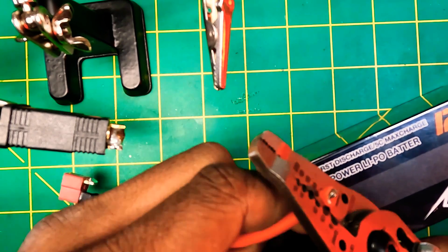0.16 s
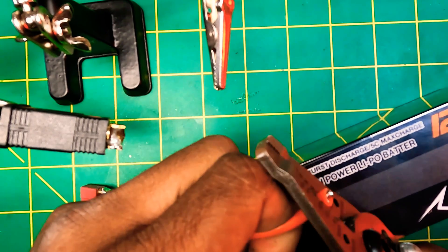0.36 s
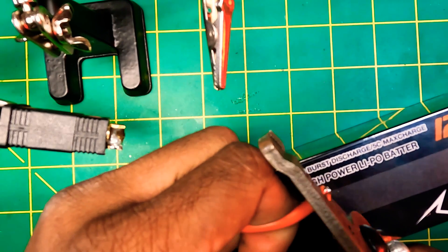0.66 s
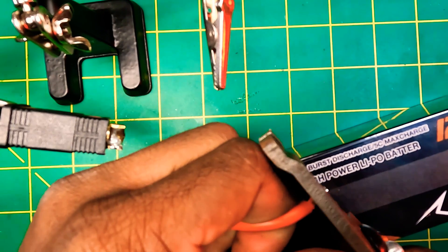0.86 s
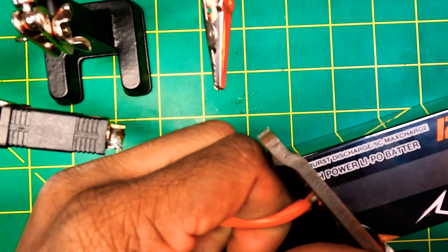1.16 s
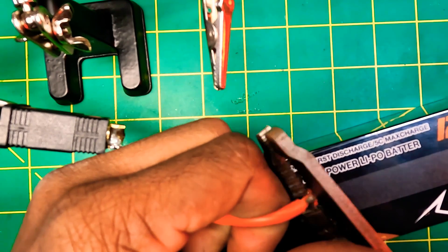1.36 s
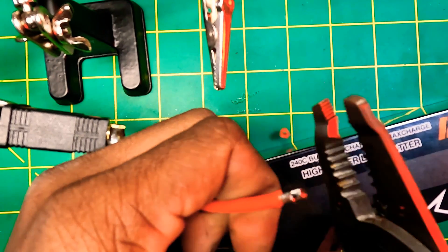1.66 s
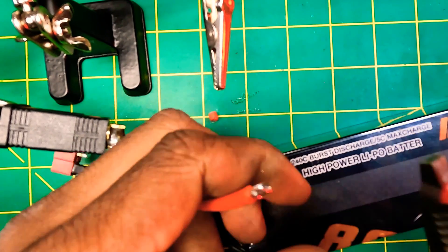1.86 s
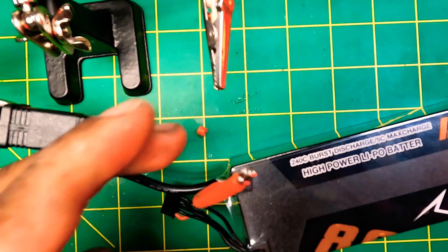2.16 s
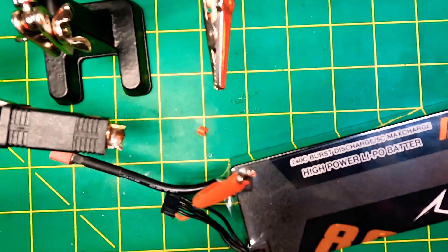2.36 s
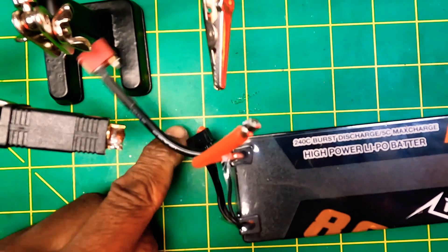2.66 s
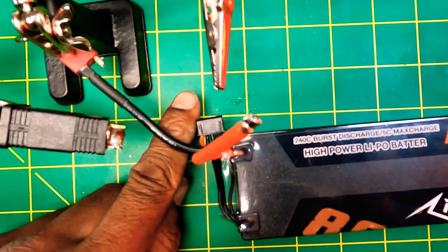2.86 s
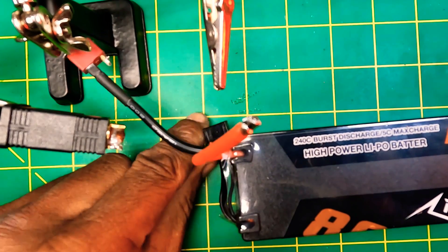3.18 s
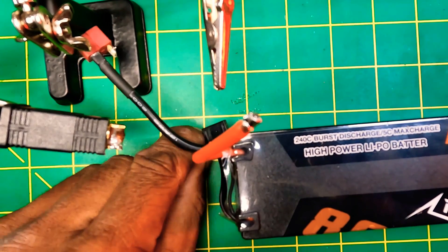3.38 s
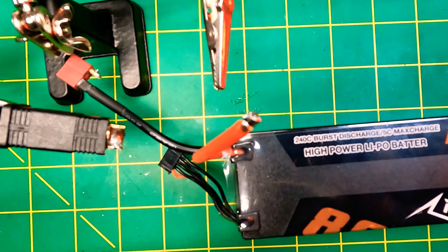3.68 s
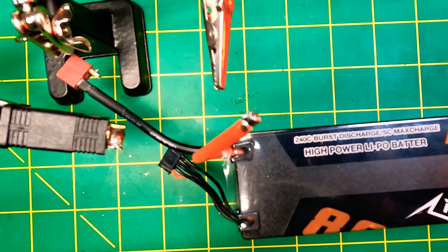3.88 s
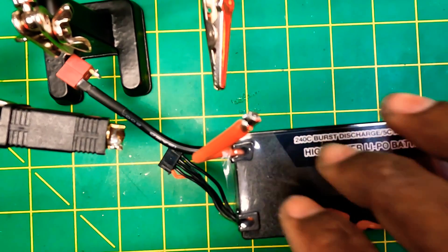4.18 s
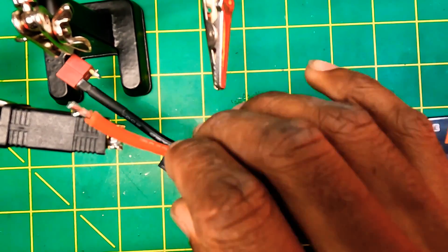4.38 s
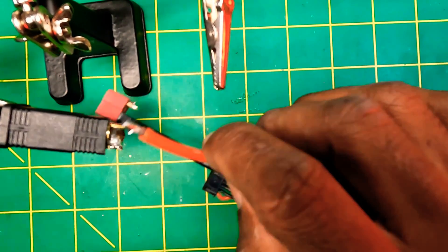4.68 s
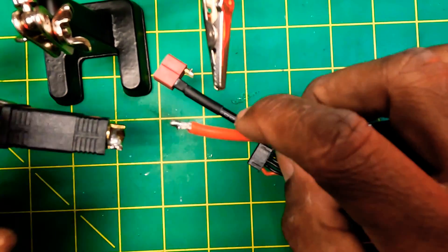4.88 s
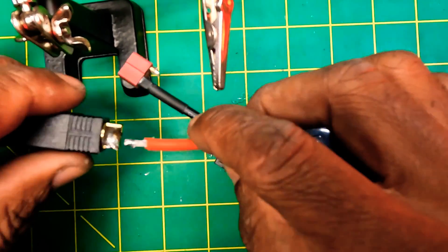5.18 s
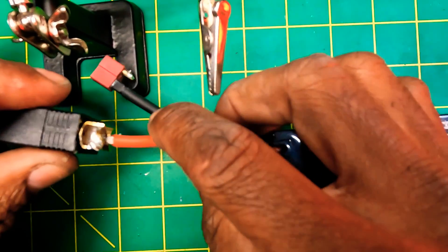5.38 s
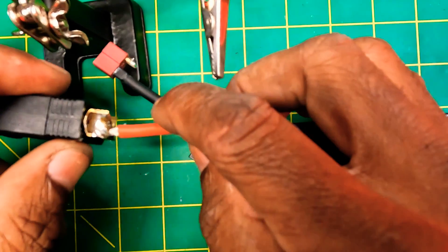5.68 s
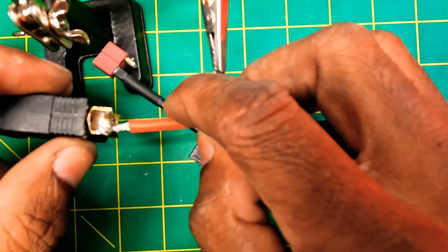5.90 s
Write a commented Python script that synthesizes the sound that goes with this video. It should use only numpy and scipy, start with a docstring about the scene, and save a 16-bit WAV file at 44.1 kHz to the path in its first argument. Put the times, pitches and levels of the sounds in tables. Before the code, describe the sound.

Close, dry workbench sounds in a small room, over soft dark air noise, a faint wavering fan hum that slowly sinks in pitch and grows stronger, and very low stand rumble. At 0.4 s wire strippers snap crisply, with a soft low bump at 0.6 and barely audible ticks after. Around 1.55 s comes a dull thud with a short scrape, then bright steel clinks at 1.85 and 1.9. At 2.4 s a loud, blunt clack hits the bench, with smaller rattles behind it. Crisp plastic clicks follow at 2.7, 3.0 and 3.3; a hard click and thud at 3.5 leads into plastic dragging, and knocks at 3.75 to 3.8. A duller tap at 4.2 gives way to light clicks and a brushing stroke near 4.8, then soft rubbing at 5.2. A strong knock lands at 5.35, a tiny tick at 5.6, and a bright, rattly click at 6.0 ends it.

```python
"""On a hobby workbench, close up: wire strippers nip a lead and are put down, a battery and its plugs
are nudged about on a cutting mat. Clicks, scrapes and strokes are shaped noise; steel jaws and bench top
are sets of dying modes struck by rough contact forces; a slowing fan hums faintly as three sines.
The bench sways the microphone with a very low rumble, and a small room answers with a short noise tail."""
import sys
import numpy as np
from scipy import signal
from scipy.fft import rfft, irfft
from scipy.io import wavfile
from scipy.ndimage import uniform_filter1d

SR = 44100
rng = np.random.default_rng(int(sys.argv[2]) if len(sys.argv) > 2 else 0)


def dump_mix(stems):
    """Bounce the given channels to the path in sys.argv[1] as a 16-bit WAV at rate SR."""
    frames = np.atleast_2d(stems).T  # one column per channel
    limited = np.clip(frames, -1, 1)  # hard clip at full scale
    pcm = np.round(limited * 32767).astype(np.int16)
    wavfile.write(sys.argv[1], SR, pcm)


N = 266452
T = np.arange(N) / SR


def from_db(db):
    """Decibels to amplitude gain."""
    return 10 ** (np.asarray(db) / 20)


def rms_one(x):
    """Scale to unit rms."""
    return x / np.sqrt(np.mean(x ** 2) + 1e-20)


def coloured(spectrum):
    """Steady noise of rms 1, its colour drawn through (frequency [Hz], relative level [dB]) points."""
    hz = np.fft.rfftfreq(N, 1 / SR) + 1
    point_hz, point_db = np.transpose(spectrum)
    gain = from_db(np.interp(np.log(hz), np.log(point_hz), point_db, -90, -90))
    return rms_one(irfft(rfft(rng.standard_normal(N)) * gain, N))


def add(out, start_s, db, sound, head_s):
    """Mix a sound in at its start time; the level is the rms of its first head_s seconds."""
    i = round(start_s * SR)
    head_rms = np.sqrt(np.mean(sound[:round(head_s * SR)] ** 2))
    out[i:i + len(sound)] += (from_db(db) / head_rms * sound)[:N - i]


def burst(t60, size=8192):
    """White noise that starts at once and dies away by 60 dB in t60 seconds."""
    return rng.standard_normal(size) * from_db(-60 * T[:size] / max(t60, 0.001))


def strike(modes, push, size=16384):
    """A rough contact force sets every mode (frequency [Hz], level [dB], t60 [s]) ringing."""
    t = T[:size]
    rings = np.zeros(size)
    for hz, db, t60 in modes:
        rings += from_db(db - 60 * t / t60) * np.sin(2 * np.pi * hz * t)
    return signal.fftconvolve(push, rings)[:size]


def air():
    """Room and microphone noise: a steady bed, darkest in the treble."""
    # colour of the bed: (frequency [Hz], relative level per Hz [dB])
    air_colour = [(25, -20), (45, -23), (70, -27), (130, -31.5), (180, -30), (230, -24), (290, -33.5),
                  (400, -37.5), (650, -42.5), (1000, -48.5), (2000, -52.5), (4000, -57), (9000, -60),
                  (16000, -61)]
    return from_db(-44) * coloured(air_colour)


def fan():
    """Three multiples of the slowing turn rate, each wavering a little in strength."""
    # turn rate and hum levels: (time [s], turn rate [Hz], first, second and third multiple [dB rms])
    fan_curve = [(0, 105.8, -48, -59, -48), (.45, 105.7, -61, -58.5, -49), (.8, 102.7, -63, -55.5, -62),
                 (2, 102.5, -60, -48, -88), (2.7, 102.5, -48.5, -54, -56), (4, 98.85, -43, -63.5, -59.5),
                 (5.5, 96.43, -41, -50, -57.5), (6.04, 94.9, -36, -49, -52.5)]
    waver_db = 2.0   # rms
    s, *columns = np.transpose(fan_curve)
    turn_hz, *levels_db = [np.interp(T, s, column) for column in columns]
    phase = 2 * np.pi * np.cumsum(turn_hz) / SR
    out = np.zeros(N)
    for multiple, db in enumerate(levels_db, start=1):
        waver = waver_db * rms_one(uniform_filter1d(rng.standard_normal(N), size=3000))
        out += np.sqrt(2) * from_db(db + waver) * np.sin(multiple * phase)
    return out


def sway():
    """Each jolt restarts the microphone stand's slow, dying rocking, over a random drift."""
    # jolts that set the stand rocking: (time [s], rms level [dB], ring t60 [s])
    jolts = [(0.451, -33.5, 4.6), (0.698, -22.5, 4.3), (1.57, -33, 6), (2.242, -20.5, 3.9),
             (2.46, -19.5, 1.5), (3.719, -24, 2.23), (5.099, -30.5, 2.8)]
    rock_hz, drift_db = 13, -36.5
    out = from_db(drift_db) * coloured([(2, 4.0), (5, -5.0), (13, -0.5), (24, -19)])
    ends = [s for s, _, _ in jolts[1:]] + [T[-1]]
    for (s, db, t60), end in zip(jolts, ends):
        t = np.maximum(T - s, 0)
        onset = 1 - np.exp(-t / 0.014)
        stilled = np.exp(-np.maximum(T - end, 0) / 0.045)   # the next jolt takes over
        rocking = np.sqrt(2) * from_db(db - 60 * t / t60) * np.sin(2 * np.pi * rock_hz * t)
        out += rocking * onset * stilled
    return out


def sliding():
    """Skin hisses smoothly, plastic drags in uneven little catches; each stroke swells and fades."""
    # strokes over the mat: (middle time [s], length [s], skin hiss level [dB], plastic drag level [dB])
    strokes = [(.66, 0.11, -73, -82), (1.477, 0.11, -57.5, -60), (2.72, 0.55, -76, -56),
               (3.63, 0.16, -56.5, -46.5), (4.804, 0.29, -53.5, -46.5), (5.213, 0.21, -56.5, -54)]
    # colour of skin on the mat: (frequency [Hz], relative level per Hz [dB])
    skin_colour = [(2500, -31), (5500, 2), (7000, -0.5), (8500, 4), (10000, -6), (15000, -6)]
    # colour of dragged plastic: (frequency [Hz], relative level per Hz [dB])
    drag_colour = [(400, 9.5), (800, -1), (1500, -2), (2600, -6), (5000, -10.5)]
    hiss_gain, drag_gain = from_db(-64.5), from_db(-61)   # steady fidgeting under the strokes
    for middle_s, length_s, hiss_db, drag_db in strokes:
        swell = np.exp(-(2 * (T - middle_s) / length_s) ** 2)
        hiss_gain = hiss_gain + from_db(hiss_db) * swell
        drag_gain = drag_gain + from_db(drag_db) * swell
    catches = from_db(1.3 * rms_one(uniform_filter1d(rng.standard_normal(N), size=400)))
    plastic = rms_one(catches * coloured(drag_colour))
    return hiss_gain * coloured(skin_colour) + drag_gain * plastic


def click_colour(hz, pitch_hz, fall_db, ring_db=-1.5, ring_share=0.07):
    """A slope either side of the pitch on a pink tilt, plus one narrow ring lent by the part that moved."""
    bass_side, bend = 0.83, 1.02   # shallower fall-off below the pitch; steepening away from it
    octaves = np.log2(hz / pitch_hz)
    distance = np.maximum(octaves, -bass_side * octaves) ** bend
    colour = from_db(-fall_db * distance) / np.sqrt(hz)
    colour *= 1 / (1 + (560 / hz) ** 6)   # small parts radiate no bass
    colour *= 1 / (1 + (hz / (8500 + 1.16 * pitch_hz)) ** 4)   # dull ones lack the top
    ring = from_db(ring_db) / (1 + ((hz - pitch_hz) / (ring_share * pitch_hz)) ** 2)
    return colour * (1 + ring)


def click(pitch_hz, fall_db, t60, rise_s, crack_gain=2.53, crack_s=0.00067, lumpy_db=4.5):
    """A crack, then a dying rattle of tiny uneven contacts; a slow rise weakens the crack."""
    size = 8192
    hz, t = np.fft.rfftfreq(size, 1 / SR) + 1, T[:size]
    noise = irfft(rfft(rng.standard_normal(size)) * click_colour(hz, pitch_hz, fall_db))
    swell = (1 - np.exp(-t / (rise_s + 0.0011))) ** 2
    lumps = rms_one(np.convolve(rng.standard_normal(size), np.hanning(300), "same"))
    rattle = noise * from_db(-60 * t / t60) * swell * from_db(lumpy_db * lumps)
    edge = irfft(rfft(noise) / (1 + (1500 / hz) ** 2))   # the crack carries no body, which builds later
    sudden = crack_gain * np.exp(-(t + rise_s) / crack_s) * (1 - np.exp(-t * pitch_hz * 2.6))
    return rattle + edge * sudden


def clicks():
    """Plugs, wire and jaws click suddenly; short scrapes of the same parts swell before they die."""
    # both: (time [s], level [dB], pitch [Hz], fall-off before bend and tilt [dB/octave], rattle t60 [s])
    click_rows = [(.150, -60, 11000, 7, .02), (0.432, -28.5, 3540, 6, 0.047), (0.675, -52.5, 8900, 10, .04),
                  (.909, -60, 9000, 9, .02), (1.186, -54, 11400, 11, .025),
                  (1.6477, -43.5, 900, -0.5, 0.058), (1.6905, -47.5, 11000, 12, 0.025),
                  (2.027, -50.5, 2640, 8, .032), (2.3833, -10, 968.5, 5.5, 0.023),
                  (2.4614, -34.5, 2430, 6, 0.045), (2.49, -43, 1930, 5, 0.077),
                  (2.5398, -44.5, 2300, 6, 0.045), (2.6869, -25, 7500, 8.5, 0.054),
                  (2.6864, -35, 3960, 21, .053), (2.819, -49.5, 2340, 26, 0.014),
                  (2.979, -29.5, 7680, 8, 0.046), (3.0876, -38.5, 1240, 14, .0076),
                  (3.266, -34.5, 3500, 0, 0.033), (3.2902, -41, 7000, 2.5, 0.076),
                  (3.3996, -42.5, 970, 13, 0.018), (3.5223, -17, 2860, 4.5, 0.049),
                  (3.7993, -30.5, 4120, 10, 0.09), (4.1921, -25.5, 875, 6.5, .025),
                  (4.3494, -45, 1440, 7.5, 0.37), (4.3936, -45.5, 2250, 8, 0.18),
                  (4.4563, -48.5, 1530, 10, 0.013), (4.4877, -44, 1060, 8.5, 0.082),
                  (4.591, -43, 920, 7, 0.035), (4.7493, -40, 1220, 21, 0.021),
                  (5.337, -17, 920, 2.5, 0.035), (5.5948, -41, 9900, 15, 0.031),
                  (6.0221, -14.5, 1610, -2, 0.085)]
    scrape_rows = [(0.459, -49, 7800, 1.2, 0.053), (1.533, -48.5, 7050, 6, .09),
                   (1.558, -35, 3090, 0.5, 0.056), (1.782, -54.5, 2500, 6.5, 0.026),
                   (2.186, -55.5, 3440, 2.5, 0.13), (2.247, -42, 1840, 2.8, 0.056),
                   (2.588, -44, 1950, 1.5, 0.18), (3.3248, -49, 2390, 5, 0.057),
                   (3.5526, -37.5, 2760, 0.5, 0.13), (3.752, -34, 1020, 2.5, .08),
                   (4.96, -54, 7700, 11, 0.049)]
    rows = [(*row, 0.00041) for row in click_rows]   # rise [s]
    rows += [(*row, 0.091 * row[-1]) for row in scrape_rows]   # rise is a share of the rattle
    out = np.zeros(N)
    for s, db, pitch_hz, fall_db, t60, rise_s in rows:
        add(out, s, db, click(pitch_hz, fall_db, t60, rise_s), head_s=0.0091 + 3 * rise_s)
    return out


def knocks(rise_s=0.0016):
    """The bench top answers blows whose force builds over milliseconds; harder ones reach higher modes."""
    # blows: (time [s], boom level [dB], hardness per step up the modes [dB], contact t60 [s])
    blows = [(0.631, -32.5, -18, 0.026), (1.564, -19, -4.5, 0.084), (2.258, -44.5, -0.5, 0.14),
             (2.384, -24, 9.5, 0.067), (2.457, -28, -34, 0.077), (2.538, -31.5, -21, 0.036),
             (2.859, -45.5, -4.5, 0.018), (3.265, -28.5, -25, 0.21), (3.522, -21.5, 3, 0.052),
             (3.563, -23, -3, .11), (3.751, -29.5, 8, 0.026), (3.798, -25, 3.5, 0.092)]
    # modes of the bench top: (frequency [Hz], relative level [dB], t60 [s])
    bench_modes = [(43.7, -1, 0.85), (98.5, -7.5, 0.32), (122.2, 13.5, 0.073), (170.75, -9, 0.079),
                   (224, -25, 0.05), (227, 0, 0.15), (259, 7.5, 0.092), (310, 16.5, 0.025),
                   (445.3, 2, 0.046), (585, -8, 0.041), (625, -6, 0.062), (722, -8.5, 0.059),
                   (946, -32, 0.1)]
    # edges between which modes make boom, thud and rap: (frequency [Hz])
    part_edges = [30, 180, 400, 1000]
    rap_loss_db = 5.5   # the top modes are a little harder to reach
    out = np.zeros(N)
    for s, boom_db, hard_db, t60 in blows:
        push = burst(t60, size=4096) * (1 - np.exp(-T[:4096] / rise_s))
        parts_db = [boom_db, boom_db + hard_db, boom_db + 2 * hard_db - rap_loss_db]
        for part_db, low, high in zip(parts_db, part_edges, part_edges[1:]):
            part_modes = [mode for mode in bench_modes if low < mode[0] < high]
            add(out, s, part_db, strike(part_modes, push), head_s=0.05)
    return out


def metal():
    """The steel jaws clink: a bright crack and short modes, those near the blow's colour favoured."""
    # clinks: (time [s], ring level [dB], colour centre [Hz], colour width [octaves], crack level [dB])
    clinks = [(1.8364, -35, 6760, 0.46, -36.5), (1.9035, -27.5, 4500, 2, -23.5)]
    # modes of the jaws: (frequency [Hz], level before the blow's colour [dB], t60 [s])
    steel_modes = [(1747, 7, 0.055), (2360, 11.5, 0.037), (2720, 13, 0.024), (4970, 0, 0.0099),
                   (5870, -14, .008), (8500, -2, 0.0065), (12800, 11, 0.013), (14200, -7, .005)]
    out = np.zeros(N)
    for s, ring_db, centre_hz, width, crack_db in clinks:
        modes = []
        for hz, mode_db, t60 in steel_modes:
            loss_db = 4.2 * (np.log2(hz / centre_hz) / width) ** 2
            modes.append((hz, mode_db - loss_db, t60))
        push = burst(0.0073, size=2048)
        push[0] = 5.0   # one hard touch, then a little chatter
        add(out, s, ring_db, strike(modes, push), head_s=0.0052)
        add(out, s, crack_db, np.diff(burst(0.06)), head_s=0.0069)
    return out


def room(x, t60=0.17, gap_s=0.0057, treble_share=0.93, split_hz=6000):
    """After a short gap the walls answer with a dense tail; soft surfaces swallow its treble sooner."""
    low_pass = signal.butter(1, split_hz, fs=SR)
    high_pass = signal.butter(1, split_hz, "high", fs=SR)
    dull = signal.lfilter(*low_pass, burst(t60, size=12000))
    bright = signal.lfilter(*high_pass, burst(t60 * treble_share, size=12000))
    tail = np.r_[np.zeros(round(gap_s * SR)), dull + bright]
    return signal.fftconvolve(x, tail / np.sqrt(np.sum(tail ** 2)))[:N]


def scene():
    """All sources, heard by one microphone; the bench boom excites the room less than the clicks do."""
    bed = air() + fan() + sway() + sliding()
    airborne = clicks() + metal()
    boom = knocks()
    echo = from_db(-5) * room(airborne + 0.38 * boom)
    return (airborne + echo + boom + bed)[None]


def record(dry):
    """Peaks are rounded, then the top is cut steeply."""
    rounded = 0.83 * np.tanh(dry / 1.001)
    top_cut = signal.cheby2(20, 80, 16000, fs=SR, output="sos")   # 80 dB down from 16 kHz
    return signal.sosfilt(top_cut, rounded)


dry = scene()
out = record(dry)
dump_mix(out)
```